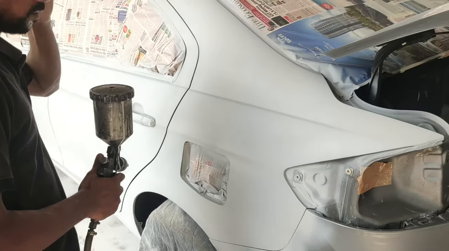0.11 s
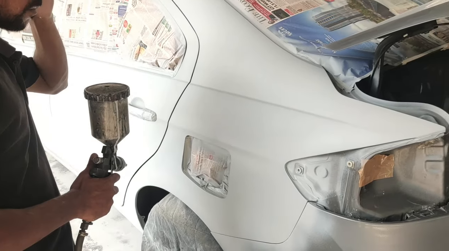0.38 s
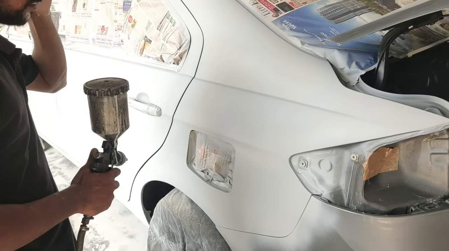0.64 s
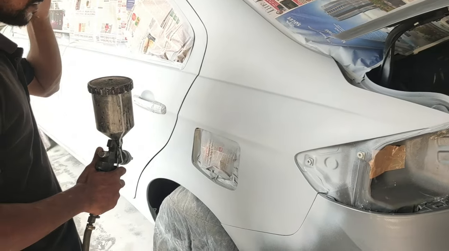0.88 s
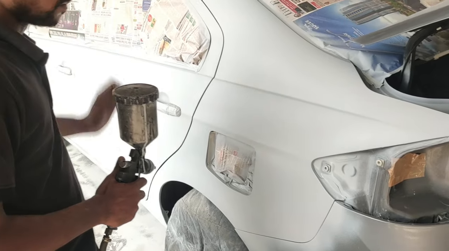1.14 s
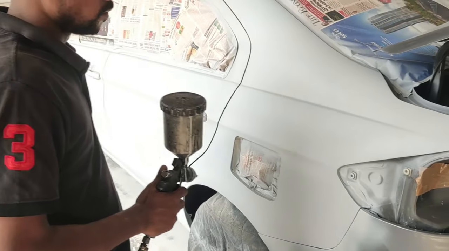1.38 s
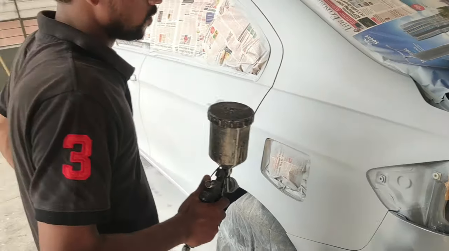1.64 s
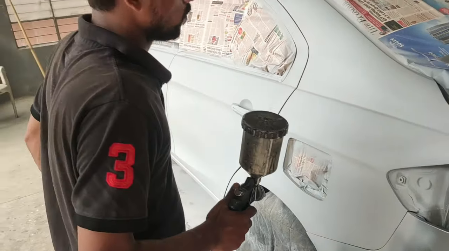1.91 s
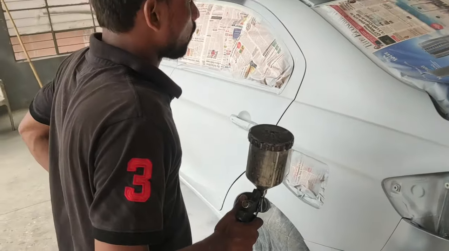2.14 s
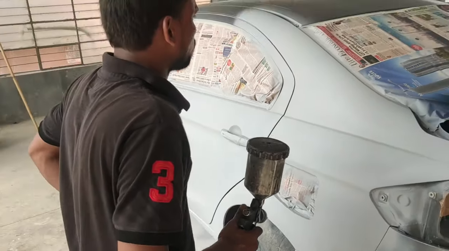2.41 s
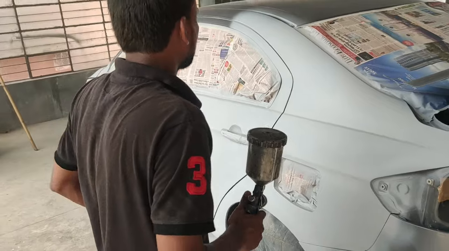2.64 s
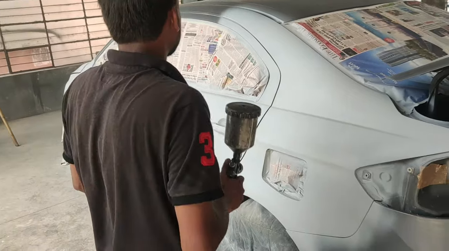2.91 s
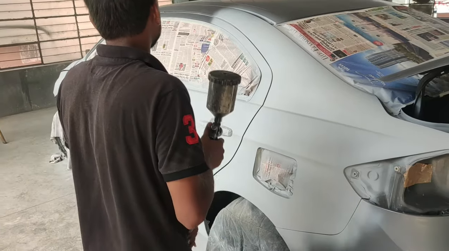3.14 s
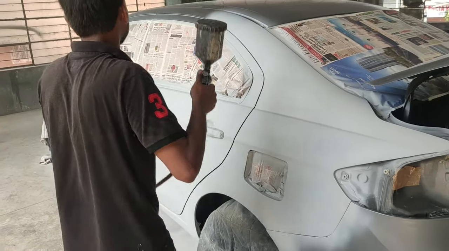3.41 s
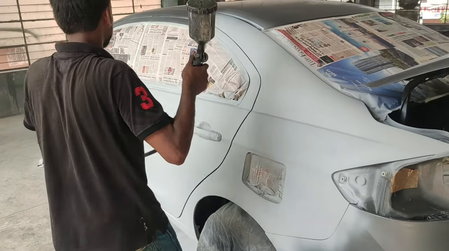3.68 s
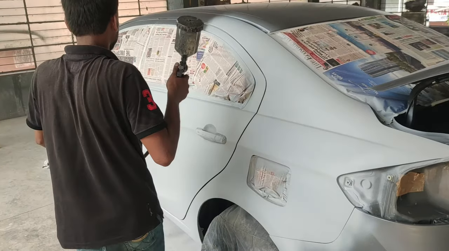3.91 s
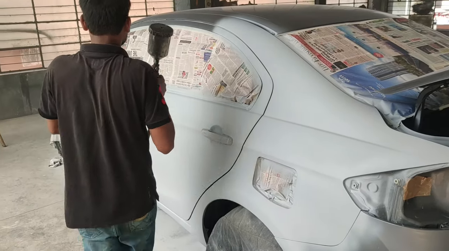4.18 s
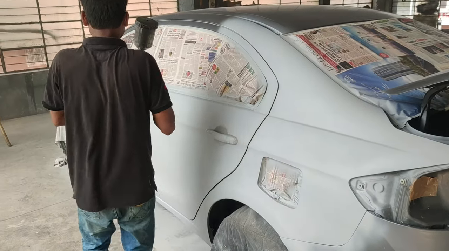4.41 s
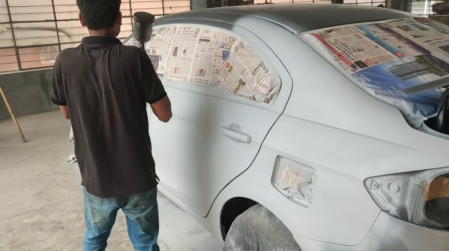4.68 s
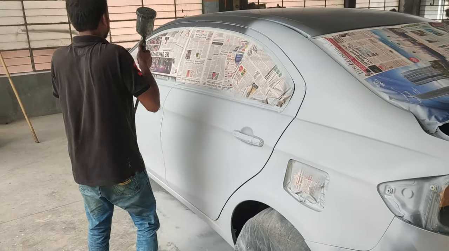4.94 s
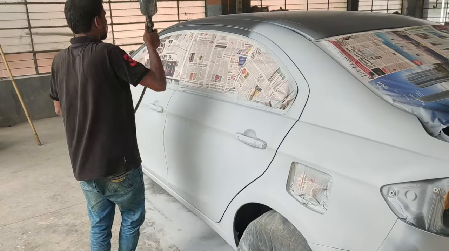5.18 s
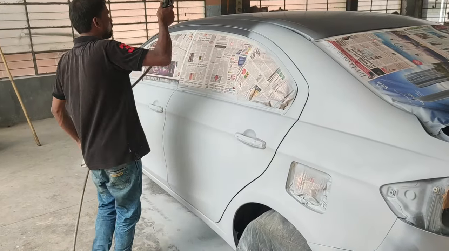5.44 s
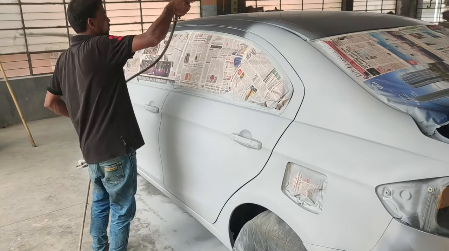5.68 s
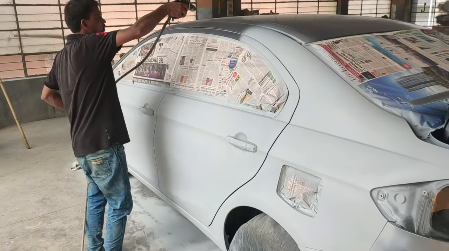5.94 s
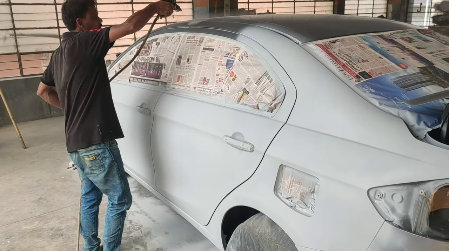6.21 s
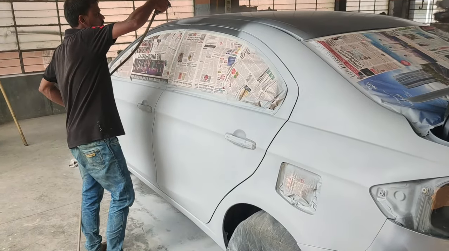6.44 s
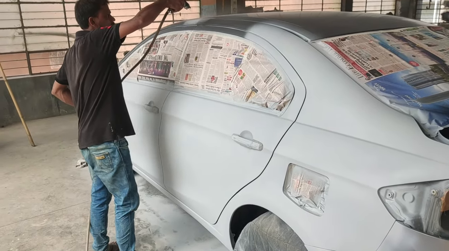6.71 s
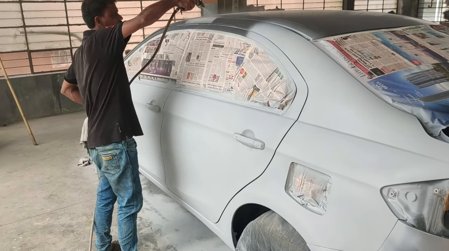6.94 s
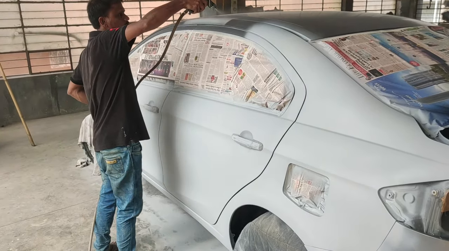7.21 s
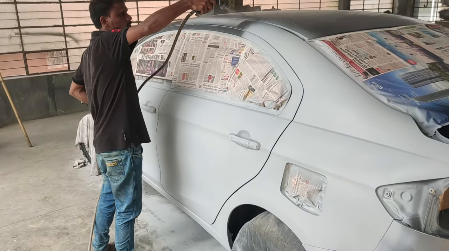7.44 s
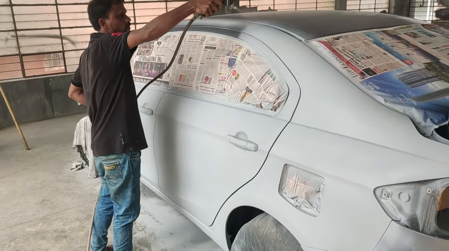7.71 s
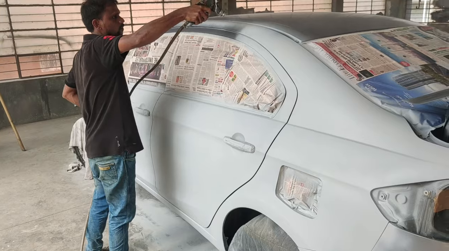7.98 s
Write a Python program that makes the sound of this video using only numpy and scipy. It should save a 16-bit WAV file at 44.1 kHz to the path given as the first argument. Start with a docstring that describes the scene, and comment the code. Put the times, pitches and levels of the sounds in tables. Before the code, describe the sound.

A strong airy spray-gun hiss beside a car body suddenly weakens midway and continues, with soft wind buffets and distant machine hum behind.

```python
"""An open workshop: compressed air hisses from a spray gun beside a car body, then drops abruptly to a weaker hiss
that continues. The hiss is shaped noise that reaches the two ports of a hand-held microphone directly,
off a near panel and scattered. Behind it the hall carries a low rumble of filtered noise, a swelling resonance,
a machine hum and a faint whine, these three made of sine tones.
Puffs of moving air, low noise under an envelope, buffet the ports."""
import sys
import numpy as np
from scipy import signal
from scipy.fft import rfft, irfft
from scipy.io import wavfile
from scipy.ndimage import uniform_filter1d

SR = 44100
rng = np.random.default_rng(int(sys.argv[2]) if len(sys.argv) > 2 else 0)


def to_wav(sig):
    """Store sig (one row per channel, or 1-D mono) as 16-bit WAV at the path in sys.argv[1].

    Samples outside -1..1 are clipped; the rate is SR.
    """
    pcm = np.clip(np.atleast_2d(sig), -1, 1) * 32767
    pcm = np.round(pcm).astype(np.int16)
    wavfile.write(sys.argv[1], SR, pcm.T)  # frames by channels


def convert_level_to_amplitude(level_db):
    """Map a level in decibels to its linear amplitude factor."""
    exponent = np.asarray(level_db, float) / 20
    return 10 ** exponent


N = 356769  # samples


def evened(x):
    """Scales a signal to unit rms."""
    return x / np.sqrt(np.mean(abs(x) ** 2) + 1e-20)


def centred(pair):
    """Scales a pair of channels so that their average has unit level."""
    return pair / np.std(pair.mean(axis=0))


def read(points, hz):
    """Reads a spectrum table at any frequency, straight between points on a log frequency axis."""
    f, value = np.transpose(points)
    return np.interp(np.log(hz + 1), np.log(f + 1), value)


def follow(rows, t):
    """Reads every column of a table in time, straight between rows."""
    s, *columns = np.transpose(rows)
    return [np.interp(t, s, c) for c in columns]


def grid(size):
    """Times (row) and frequencies (column) of short-time spectra that overlap by three quarters."""
    hop = size // 4
    return np.arange(N // hop + 5) * hop / SR, np.fft.rfftfreq(size, 1 / SR)[:, None]


def chance(t, hz, count):
    """Independent noise spectra: complex Gaussian values at every frequency and time."""
    a, b = rng.standard_normal((len(t), len(hz), count, 2)).T
    return a + 1j * b


def diffuse(t, hz):
    """Sound from all sides: alike at both ports only while the wave is longer than their spacing."""
    spacing_m, sound_m_per_s = 0.13, 343
    a, b = chance(t, hz, count=2)
    same = np.sinc(2 * hz * spacing_m / sound_m_per_s)
    return np.array([a, same * a + np.sqrt(1 - same ** 2) * b])


def heard(z):
    """Turns short-time spectra into sound by overlap-add."""
    size = 2 * (z.shape[-2] - 1)
    return signal.istft(z, nperseg=size, noverlap=3 * size // 4)[1][..., :N]


def patches(t, hz, frames, bins):
    """Random unevenness of unit rms, smoothed over time and frequency."""
    field = rng.standard_normal((len(t), len(hz))).T
    smooth = uniform_filter1d(field, frames, axis=1)
    return evened(uniform_filter1d(smooth, bins, axis=0))


def wander(count, size):
    """A slow random drift of unit rms, smoothed over size points."""
    return evened(uniform_filter1d(rng.standard_normal(count), size))


def swells(rows, rest_db=-90):
    """Envelope of events that grow and die away exponentially over a resting level."""
    t = np.arange(N) / SR
    envelope = convert_level_to_amplitude(rest_db)
    for peak_s, db, rise_s, fall_s in rows:
        age = np.where(t < peak_s, (peak_s - t) / rise_s, (t - peak_s) / fall_s)
        envelope = envelope + convert_level_to_amplitude(db) * np.exp(-age)
    return envelope


def sine(hz):
    """A sine of unit peak whose frequency may change from sample to sample."""
    return np.sin(2 * np.pi * np.cumsum(hz) / SR)


# Colour of the far rumble. Each row: frequency in Hz, relative density in dB per Hz.
RUMBLE_COLOUR = [(24, -21), (40, -5), (54, -3), (119, -9), (146, -8.5), (242, -13), (366, -14.5),
                 (436, -17.5), (1130, -21), (1390, -24.5), (2500, -26.5), (3250, -43), (5500, -120)]
# Swell of the upper rumble, heard as departures from its mean. Each row: time in seconds, level in dB.
UPPER_RUMBLE = [(0, -45), (1, -44), (2.2, -44), (2.58, -43.5), (2.75, -36), (3.1, -42.5), (3.95, -42),
                (4.55, -42.5), (4.8, -45.5), (5.8, -47), (6.3, -46), (7.6, -45.5), (8.09, -42)]
# The lowest rumble's own drift. Each row: time in seconds, change in dB.
LOW_RUMBLE_DRIFT = [(0, 1.5), (2.75, 2), (3.2, -0.5), (4.6, 0), (6.599, 1), (7.3, -1), (8.09, -2.5)]


def rumble(level_db=-38, patchy_db=1.5, low_share=0.41):
    """Far machines and traffic blurred by the hall: diffuse noise whose lowest part swells less than the rest."""
    t, hz = grid(size=4096)
    upper_db = follow(UPPER_RUMBLE, t)[0]
    swing_db = upper_db - upper_db.mean()
    up = np.clip(np.log2((hz + 1) / 140), 0, 1)  # from the low part to the upper within an octave
    fading = np.clip(np.log2(1800 / (hz + 1)) / 1.06, 0, 1)  # the swell thins out toward the treble
    swell_db = (up * fading + (1 - up) * low_share) * swing_db
    swell_db += (1 - up) * follow(LOW_RUMBLE_DRIFT, t)[0]
    uneven_db = patchy_db * patches(t, hz, frames=5, bins=6)
    z = diffuse(t, hz) * convert_level_to_amplitude(read(RUMBLE_COLOUR, hz) + swell_db + uneven_db)
    return convert_level_to_amplitude(level_db) * evened(heard(z))


# Swells of a hall resonance. Each row: peak in seconds, level in dB, rise in seconds, fall in seconds.
BOOM_SWELLS = [(.43, -45, .3, 0.47), (2.2, -45.5, 0.37, 0.24), (2.69, -30.5, 0.05, 0.047),
               (3.67, -39.5, 0.14, .2)]


def boom(centre_hz=94.9, waver=0.0326, rest_db=-58):
    """One low resonance of the hall: a sine of unsteady pitch that swells over a resting level."""
    tone = sine(centre_hz * (1 + waver * wander(N, 3000)))
    return np.sqrt(2) * swells(BOOM_SWELLS, rest_db) * tone  # the root of two makes the levels rms


# Swells of the whine, the second the strongest.
# Each row: peak in seconds, level in dB, rise in seconds, fall in seconds.
WHINE_SWELLS = [(3.03, -51, .07, .15), (3.24, -39.5, .14, 0.06), (3.42, -49.5, 0.077, 0.24)]


def tones(waver=0.0132, motor_waver=0.01495):
    """The steady hum of a motor, its fainter unsteady upper tone, and a whine that swells and creeps upward."""
    hum_hz, hum_db = 26.2, -40
    motor_hz, motor_db = 153, -52.5
    whine_hz, creep_hz_per_s = 357.4, 8  # the pitch at the first swell's peak, before the waver
    t = np.arange(N) / SR
    drift = wander(N, 4000)
    rising_hz = whine_hz + creep_hz_per_s * (t - WHINE_SWELLS[0][0])
    whine = swells(WHINE_SWELLS) * sine(rising_hz * (1 + waver * drift))
    motor = convert_level_to_amplitude(motor_db) * sine(motor_hz * (1 + motor_waver * drift[::-1]))
    hum = convert_level_to_amplitude(hum_db) * np.sin(2 * np.pi * hum_hz * t)
    return np.sqrt(2) * (whine + motor + hum)


# Puffs of air on the microphone ports. Each row: peak in seconds, level in dB.
PUFFS = [(.55, -41.5), (2.1, -37), (4.27, -30.5), (4.45, -36), (4.65, -45), (5.25, -43), (5.85, -37.5),
         (6.9, -38), (7.7, -42)]
# Colour of the moving air. Each row: frequency in Hz, relative density in dB per Hz.
GUST_COLOUR = [(5, -20), (14, -4), (28, -4), (45, -8), (90, -19), (200, -45.5)]


def buffet(apart=0.45, left_db=2.5):
    """Lumpy low pressure from moving air, partly different at each port and stronger on the left."""
    rise_s, fall_s, still_air_db = 0.061, 0.13, -45.5
    t, hz = grid(size=8192)
    both, left, right = chance(t, hz, count=3)
    ports = np.array([convert_level_to_amplitude(left_db) * (both + apart * left), both + apart * right])
    air = centred(heard(ports * convert_level_to_amplitude(read(GUST_COLOUR, hz))))
    return swells([(s, db, rise_s, fall_s) for s, db in PUFFS], still_air_db) * air


def facing_panel(t):
    """How far the gun points at the near panel, 0 to 1, with a short turn at either end."""
    start_s, end_s, turn_s = 1.5, 3.1, .2
    return np.clip(np.minimum(t - start_s, end_s - t) / (2 * turn_s) + .5, 0, 1)


# The jet heard straight. Each row: time in seconds, lag of the left port in ms, share of the hiss power.
STRAIGHT_PATH = [(0, .11, .13), (1.2, .11, .13), (1.7, .02, .1), (3.3, -.06, .06), (4.2, -.02, .16),
                 (4.6, .05, .06), (8.09, .02, .15)]


def jet_paths(t, hz):
    """Turbulence noise arriving straight and off the panel, each with its own port lag, the rest scattered."""
    panel_lag_ms, share_away, share_facing = .43, .03, .16
    lag_ms, share = follow(STRAIGHT_PATH, t)
    panel_share = share_away + (share_facing - share_away) * facing_panel(t)

    def left_late(ms):
        return np.array([np.exp(-2j * np.pi * hz * ms / 1000), np.ones((len(hz), len(t)))])

    straight, panel = chance(t, hz, count=2)
    z = np.sqrt(share) * straight * left_late(lag_ms)
    z = z + np.sqrt(panel_share) * panel * left_late(panel_lag_ms * np.ones(len(t)))
    return z + np.sqrt(1 - share - panel_share) * diffuse(t, hz)


# Where the jet hisses strongest. Each row: time in seconds, frequency in Hz.
CREST_PITCH = [(0, 9000), (1.5, 9500), (2.85, 8100), (3.2, 9150), (8.09, 9200)]
# A narrow whistle in the hiss at the left port. Each row: time in seconds, height in dB.
LEFT_WHISTLE = [(0, 1.5), (.6, 4), (1.35, 4), (1.6, 0), (8.09, 0)]


def jet_crest(t, hz):
    """Bumps in the hiss at each port: a crest heard higher on the right, a left whistle, air off the panel."""
    left_db, right_db, width_hz, right_ratio = 2.5, 1, 1230, 1.07
    airy_hz, airy_db = 14300, 2.5  # an airy band on the left while facing the panel
    whistle_hz, whistle_width_hz = 8770, 110

    def bump(at_hz, wide_hz):
        return np.exp(-((hz - at_hz) / wide_hz) ** 2)

    crest_hz = follow(CREST_PITCH, t)[0]
    left = left_db * bump(crest_hz, width_hz)
    left += airy_db * facing_panel(t) * bump(airy_hz, width_hz)
    left += follow(LEFT_WHISTLE, t)[0] * bump(whistle_hz, whistle_width_hz)
    return np.array([left, right_db * bump(right_ratio * crest_hz, width_hz)])


# The compressed-air hiss. Each row: time in seconds, level in dB, brightness in dB toward the top,
# level of the lower hiss in dB.
JET_COURSE = [(0, -24, -2.5, 1), (.8, -24.5, -2.5, 0.5), (1.5, -23.5, -3, -1), (2.63, -22.5, -3.5, -3.5),
              (3.2, -25, -3.5, -1), (4.0, -24.5, -2.5, -0.5), (4.33, -25.5, -5, -1),
              (4.38, -28, -4.5, -0.5), (4.95, -29.5, -6, -2), (5.2, -30, -4.5, .5), (5.6, -31.5, -3.5, 1),
              (6.0, -30, -4.5, 0), (6.3, -31, -2, 3), (6.7, -32, -2, .5), (7.6, -30.5, -4, -0.5),
              (7.9, -29.5, -2.5, -0.5), (8.09, -31, -3, 1)]
# Colour of the nozzle. Each row: frequency in Hz, relative density in dB per Hz.
NOZZLE_COLOUR = [(700, -35), (1200, -18), (1700, -18.5), (2500, -14.5), (3300, -10.5), (4100, -7),
                 (6000, -4), (8000, -2), (10500, -.5), (12000, -.5), (14000, 0), (16000, 0)]


def jet(patchy_db=.8, flutter_db=.3, sway_db=.4, facing_pan_db=-1.1):
    """Turbulent hiss: noise of changing colour whose level drops abruptly and carries on weaker."""
    shoulder_hz, shoulder_octaves = 4400, 0.67  # the lower hiss comes and goes as the gun turns
    t, hz = grid(size=512)
    level_db, bright_db, shoulder_db = follow(JET_COURSE, t)
    z = jet_paths(t, hz)
    flutter = wander(len(t), 12)  # hose pressure
    sway = wander(len(t), 100)  # small turns of the gun
    octaves = np.log2((hz + 1) / 8000)
    colour_db = read(NOZZLE_COLOUR, hz) + bright_db * np.clip(octaves, 0, 1)
    colour_db += shoulder_db * np.exp(-(np.log2((hz + 1) / shoulder_hz) / shoulder_octaves) ** 2)
    # the low end follows the level less
    colour_db += 0.53 * (level_db.mean() - level_db) * np.clip(-octaves - 1, 0, 1)
    uneven_db = patchy_db * patches(t, hz, frames=60, bins=3) + flutter_db * flutter
    z = z * convert_level_to_amplitude(colour_db + jet_crest(t, hz) + uneven_db)
    side = np.array([.5, -.5])[:, None, None]
    z = z * convert_level_to_amplitude(side * (sway_db * sway + facing_pan_db * facing_panel(t)))  # facing the panel leans right
    return convert_level_to_amplitude(follow(JET_COURSE, np.arange(N) / SR)[0]) * centred(heard(z))


def scene():
    """Sums the hall, the moving air and the spray gun at the two ports."""
    return rumble() + boom() + tones() + buffet() + jet()


def top_cut(x):
    """Nothing passes above the cut-off."""
    return signal.sosfilt(signal.butter(12, 17090, fs=SR, output="sos"), x)


# Colour difference of the microphone ports. Each row: frequency in Hz, left over right in dB.
PORT_BALANCE = [(30, .6), (80, .4), (300, .4), (740, 1.5), (1220, 1.5), (2010, -0.5), (3330, 2.5),
                (5500, 4), (7200, 2.5), (9300, 2), (11500, -.5), (14000, 1), (15700, 1.5)]


def record(dry):
    """The two ports differ in colour, and nothing passes above the band limit."""
    edge_hz = 15840
    hz = np.fft.rfftfreq(N, 1 / SR)
    tilt_db = read(PORT_BALANCE, hz) * np.array([[.5], [-.5]])
    mix = irfft(rfft(dry) * convert_level_to_amplitude(tilt_db) * (hz < edge_hz), N)
    return top_cut(mix)


dry = scene()
out = record(dry)
to_wav(out)
```